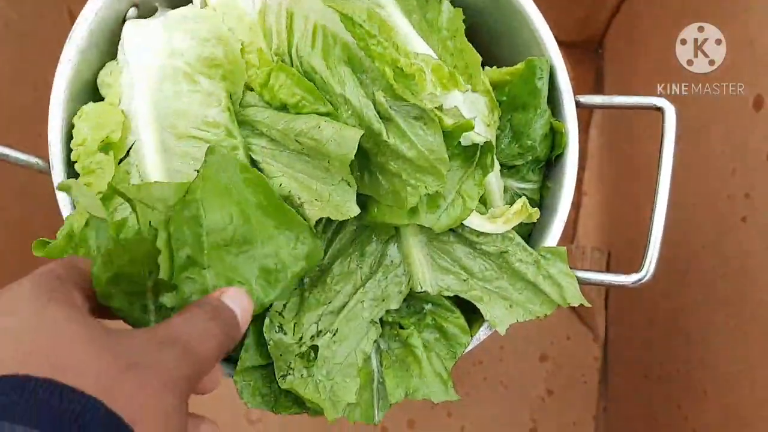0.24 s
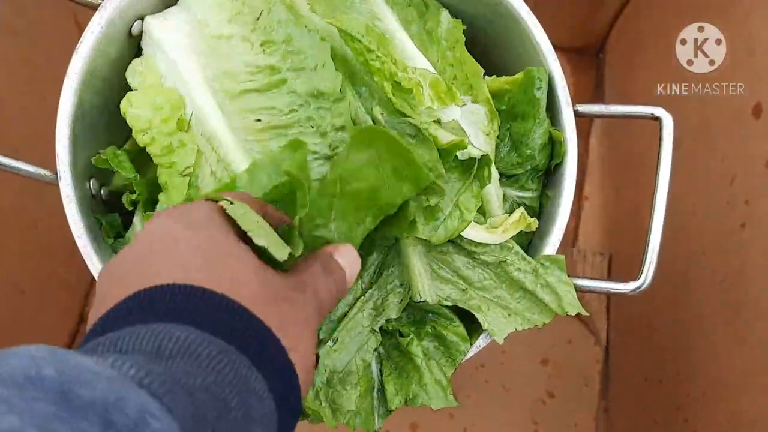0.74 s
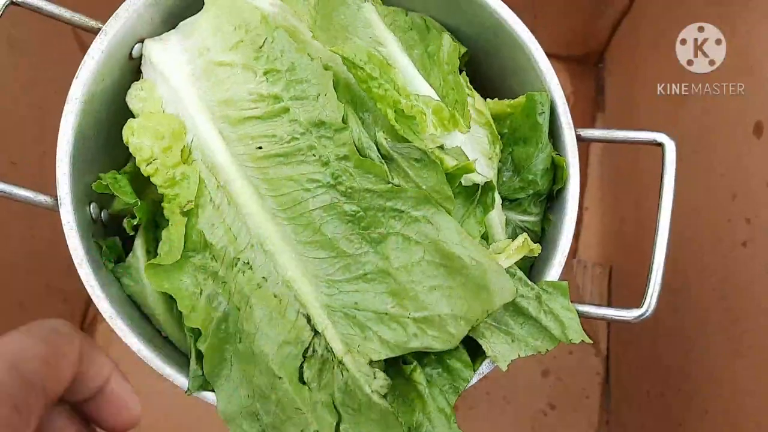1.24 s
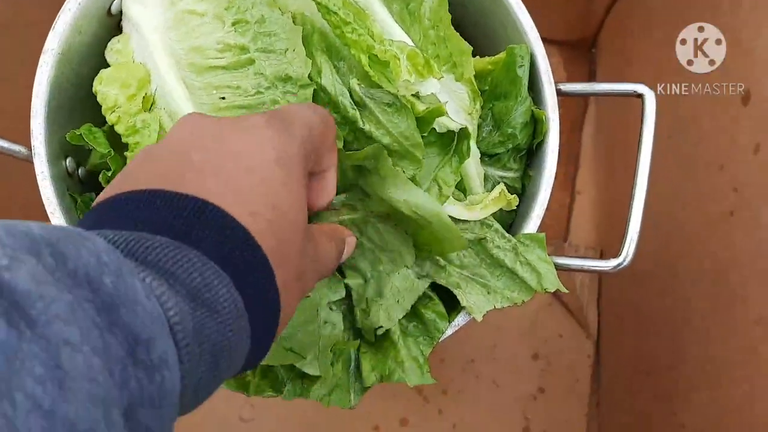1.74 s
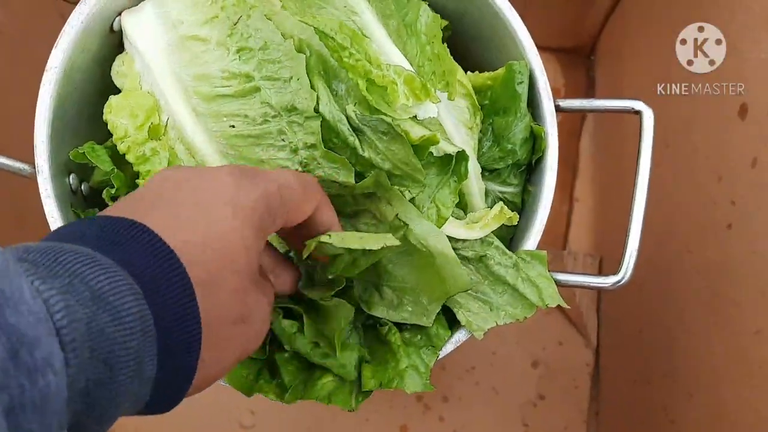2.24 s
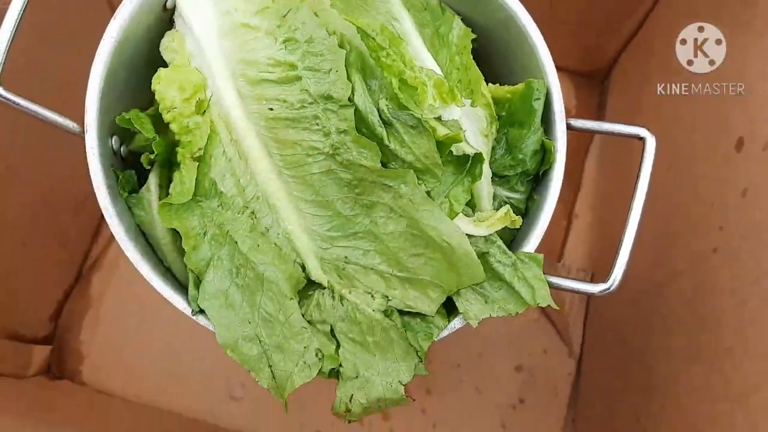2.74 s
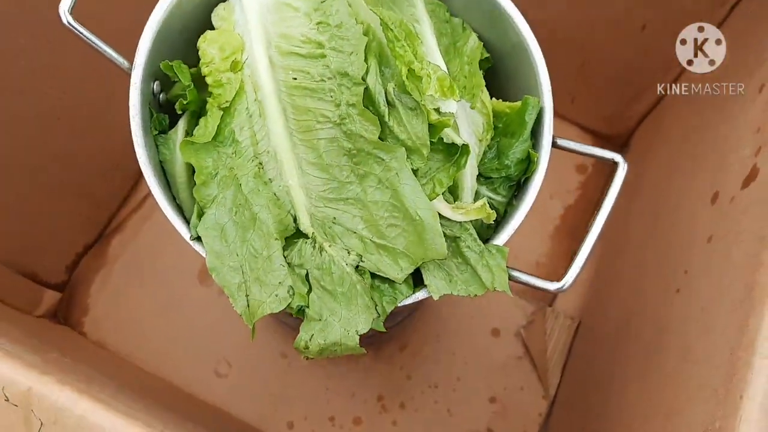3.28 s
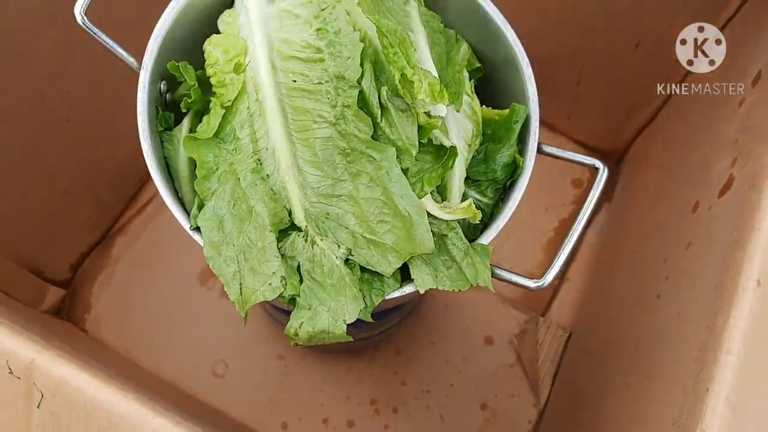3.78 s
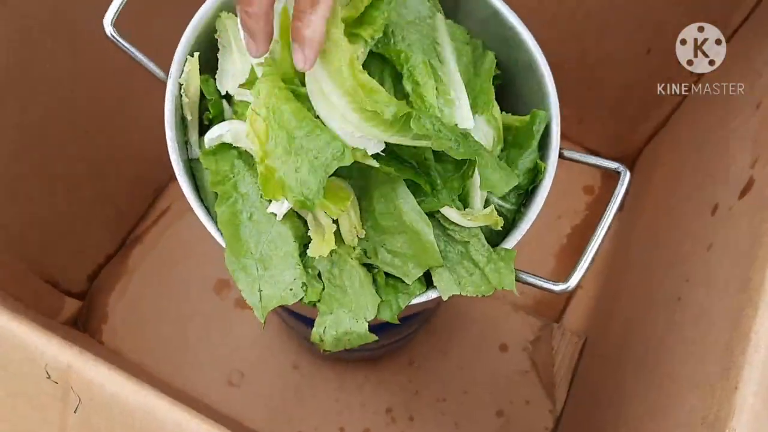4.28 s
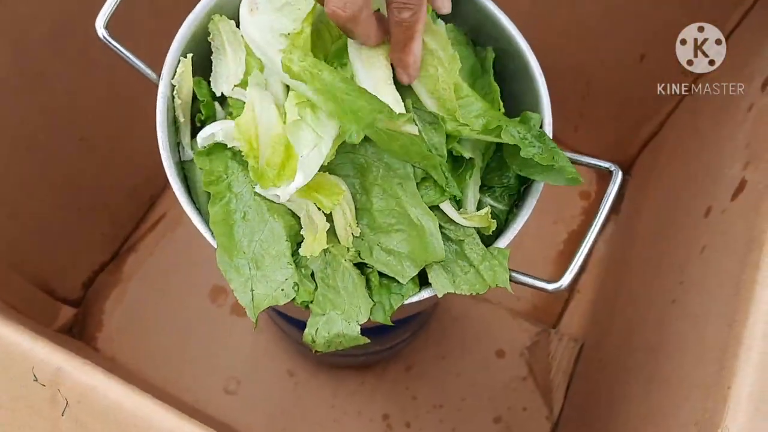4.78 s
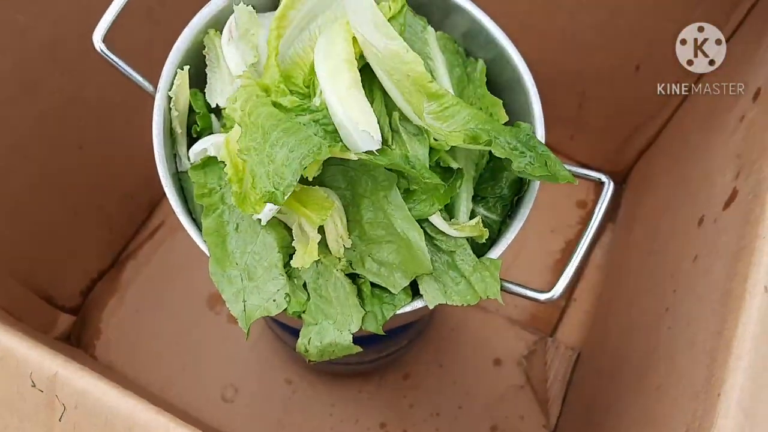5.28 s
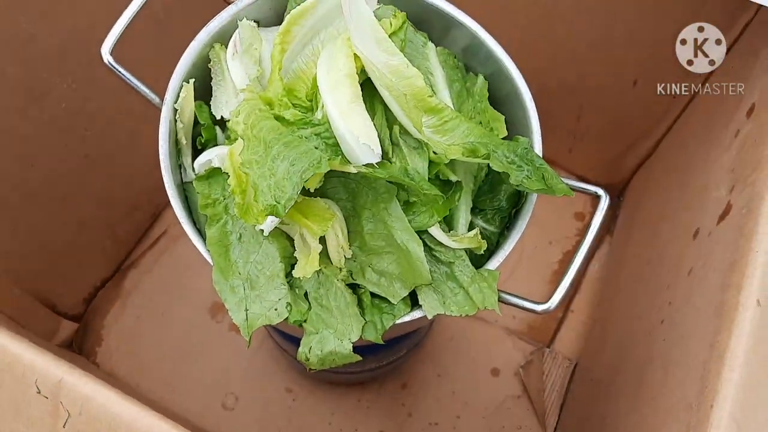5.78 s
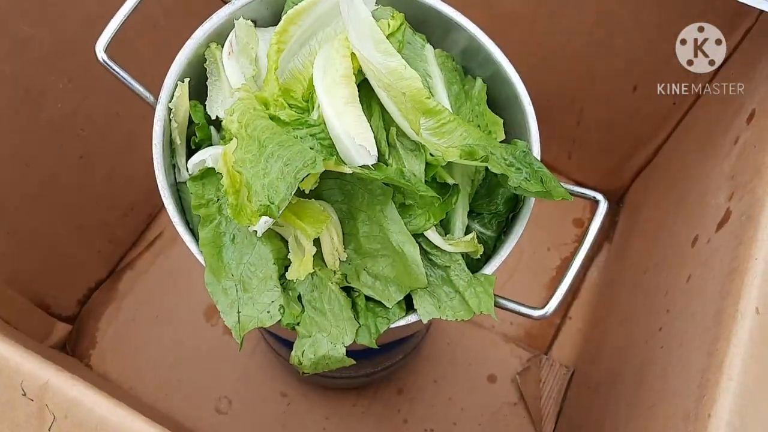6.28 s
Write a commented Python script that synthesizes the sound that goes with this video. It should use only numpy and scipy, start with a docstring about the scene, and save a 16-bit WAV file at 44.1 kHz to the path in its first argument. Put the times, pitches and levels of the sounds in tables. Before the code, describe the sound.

A portable gas burner runs under a cooking pot for the whole six and a half seconds. Its flame makes a deep, uneven rumble with frequent soft, low pops and a slightly hollow roar from the cardboard windbreak. Now and then the rumble drops briefly, often on one side only. Above it, gas hisses steadily with two faint, high, fuzzy whistles. Lettuce leaves snap with small crisp ticks at about 1.7, 2.1 and 2.4 seconds, then rustle softly near 2.8. Between 3.2 and 3.9 seconds the close microphone backs off, and the hiss and roar soften a little. At about 4 seconds a hand rustles the leaves and bumps the pot, giving one short, dull ring. Faint leaf ticks follow around 4.6 and 4.9, and a tiny rustle at 6.3. The flame swells briefly near 4.6 and 6 seconds and keeps burning.

```python
"""The flame of a portable gas burner rumbles and pops under a cooking pot. It burns in uneven puffs,
and the gap under the pot and a cardboard windbreak colour its roar. Now and then the rumble drops
briefly, often on one side only. Gas rushing from the nozzle hisses, with two fuzzy whistles.
A hand rustles lettuce leaves, which tick as they snap, and bumps the pot once.
The microphone starts close and backs off midway."""
import sys
import numpy as np
from scipy import signal
from scipy.fft import rfft, irfft, next_fast_len
from scipy.io import wavfile
from scipy.ndimage import uniform_filter1d, map_coordinates

SR = 44100
rng = np.random.default_rng(int(sys.argv[2]) if len(sys.argv) > 2 else 0)


def waveform_to_disk(signal):
    """Save audio, clipped to [-1, 1], as 16-bit WAV at the path in sys.argv[1]."""
    frames = np.transpose(np.atleast_2d(signal))
    scaled = np.clip(frames, -1, 1) * 32767
    samples = np.round(scaled).astype(np.int16)
    wavfile.write(sys.argv[1], SR, samples)


N = 287515
TIME = np.arange(N) / SR
BACK_OFF_S = (3.2, 3.92)  # the microphone moves away between these times


def amp(db):
    """Turn decibels into a number to multiply by."""
    return np.exp(np.asarray(db) * (np.log(10) / 20))


def unit(x):
    """Scale a signal to an average (rms) strength of 1."""
    return x / np.sqrt(np.mean(np.abs(x) ** 2) + 1e-20)


def along(points, hz):
    """Read between (frequency, value) points, with octaves evenly spaced."""
    f, v = np.transpose(points)
    return np.interp(np.log(hz + 1), np.log(f + 1), v)


def curves(rows):
    """Join timed rows with straight lines: one curve for each column after the time."""
    times, *columns = np.transpose(rows)
    return [np.interp(TIME, times, column) for column in columns]


def wobble(rate):
    """A smooth random curve that takes a new value `rate` times a second."""
    coarse = TIME[::32]
    values = rng.standard_normal(int(N / SR * 100) + 4)
    return np.interp(TIME, coarse, map_coordinates(values, [coarse * min(rate, 100)]))


def sides(pan_db):
    """Left and right gains; a positive pan is louder on the left."""
    return amp(np.array([pan_db / 2, -pan_db / 2]))


def away(near, far):
    """A value that glides from near to far as the microphone backs off."""
    return np.interp(TIME, BACK_OFF_S, (near, far))


def near_far(pair):
    """Fade from the near version of a sound to mostly its far version."""
    share = away(0, 0.95)
    return (1 - share) * unit(pair[0]) + share * unit(pair[1])


def filtered(x, response):
    """Turn each frequency of x up or down by the gain response(f)."""
    size = next_fast_len(x.shape[-1] + 8192)
    return irfft(rfft(x, size) * response(np.fft.rfftfreq(size, 1 / SR)), size)[..., :x.shape[-1]]


def off_centre(f, hz, width_hz):
    """How far f lies from the middle of a band: 0 at hz, about 1 or -1 at its edges."""
    return (f * f - hz * hz) / ((f + 1) * width_hz)


def resonances(table):
    """A filter shape with one hump for each (frequency, width, level) row."""
    return lambda f: np.sqrt(sum((amp(db) / (1 + off_centre(f, hz, width) ** 2)) ** 2
                                 for hz, width, db in table))


def patches(shape, wide_hz, long_s):
    """A random map over frequency and time, with patches about wide_hz by long_s."""
    rows = np.arange(shape[0]) * SR / 1024 / wide_hz
    columns = np.arange(shape[1]) * 512 / SR / long_s
    grid = np.meshgrid(rows, columns, indexing="ij")
    return unit(map_coordinates(rng.standard_normal((200, 300)), grid, mode="wrap", order=2))


# How alike left and right sound: f/Hz, likeness (1 = the same)
LIKENESS = [(60, .62), (130, .52), (290, .68), (700, .88), (1200, .68), (1700, .3), (4000, .62), (6500, .7),
            (10000, .55), (15000, .2)]
# How much louder the left side is: f/Hz, pan/dB
BALANCE = [(60, 1), (110, -3.5), (200, 0), (380, 0.5), (700, 1), (1290, 0.5), (2380, 0.5), (4400, -1.5),
           (8120, -2), (15000, 0)]


def rush(response, patchy_db, wide_hz, long_s, focus=1, drift=0.98, lead=(0, 0)):
    """Rushing stereo noise; wall echoes reach each side with drifting strength and timing."""
    hz, times, noise = signal.stft(rng.standard_normal((2, N + 1024)), SR, nperseg=1024)
    spread = np.arccos(np.clip(focus * along(LIKENESS, hz), 0, 1))[:, None] / 2  # more focus: narrower
    mid, side = np.cos(spread) * noise[0], np.sin(spread) * noise[1]
    # Short waves arrive out of step; lead is the left side's head start in radians, near and far.
    treble = np.clip((hz[:, None] - 1300) / 600, 0, 1)
    phase = drift * patches(mid.shape, 110, 1.46) + np.interp(times, BACK_OFF_S, lead) / 2
    slip = np.exp(1j * treble * phase)
    lean = amp(along(BALANCE, hz) / 2)[:, None]
    both_db, left_db, right_db = (patchy_db * share * patches(mid.shape, wide_hz, long_s)
                                  for share in (0.36, 0.22, 0.31))
    left = (mid + side) * slip * lean * amp(both_db + left_db)
    right = (mid - side) / slip / lean * amp(both_db + right_db)
    pair = signal.istft(np.array([left, right]), SR, nperseg=1024)[1][:, :N]
    return unit(filtered(pair, response))


# The quick touches that make up one bump: t/s, peak level/dB
POT_TOUCHES = [(3.96, -23), (3.972, -26), (3.978, -26), (3.985, -29), (4.005, -33.5), (4.024, -34.5)]
# The tones of the pot: f/Hz, relative level/dB, time to fade by 60 dB/s
POT_TONES = [(332, 0.5, 0.05), (382, 10, 0.059), (426, -1, 0.098), (487, 4, 0.04), (610, -7, 0.036),
             (1040, -2, 0.053), (1292, -8, 0.047), (1504, -7.5, 0.032)]


def pot_bump():
    """A hand bumps the leaf-filled pot, which gives a short, dull ring."""
    out, t = np.zeros(N + SR), TIME[:SR // 4]
    for start, db in POT_TOUCHES:
        ring = sum(amp(level + 3 * rng.standard_normal() - 60 * t / fade_s) * np.sin(2 * np.pi * hz * t)
                   for hz, level, fade_s in POT_TONES)
        ring *= 1 - np.exp(-t / 0.0026)  # soft contact
        out[round(start * SR):][:len(t)] += amp(db) * ring / np.max(np.abs(ring))
    return out[:N] * sides(3.5)[:, None]


# Leaves snapping: t/s, level/dB, f/Hz, width/Hz
LEAF_TICKS = [(1.7192, -31, 3600, 5000), (1.719, -34, 1100, 1500), (1.719, -41, 12500, 8000),
              (2.106, -38, 12600, 10000), (2.1062, -52, 2500, 3000), (2.1085, -34, 10000, 14000),
              (2.1446, -47, 11000, 8000), (2.441, -40, 7060, 9000), (3.5045, -45, 9000, 9000),
              (3.8955, -42, 6500, 9000), (3.973, -38, 3630, 2500), (4.5995, -45, 3020, 3000),
              (4.899, -48, 5000, 5000)]
# Leaves being handled: t/s, length/s, level/dB, f/Hz, width/Hz
LEAF_RUSTLES = [(2.748, 0.16, -47.5, 2200, 1800), (2.771, 0.1, -46.5, 700, 250),
                (2.797, 0.094, -52.5, 1290, 200), (3.889, 0.033, -39.5, 7900, 7000),
                (3.918, 0.061, -43, 3200, 930), (3.92, 0.11, -42.5, 4500, 10000),
                (3.961, 0.046, -42.5, 960, 1120), (3.96, 0.17, -48.5, 3180, 4000),
                (4.6, 0.03, -54, 3300, 3500), (6.292, 0.1, -55, 2000, 2500)]


def leaves():
    """Crisp leaves tick as they snap and crackle densely under the hand."""
    out, t = np.zeros((2, N + SR)), TIME[:SR // 5]
    tick_fade = amp(-60 * t / 0.0069)
    for start, db, hz, width_hz in LEAF_TICKS:
        crack = unit(filtered(rng.standard_normal(len(t)), resonances([(hz, width_hz, 0)])))
        ring = 0.5 * np.sin(2 * np.pi * hz * t)
        snap = tick_fade * (ring + crack)
        out[:, round(start * SR):][:, :len(t)] += amp(db) * sides(pan_db=-9)[:, None] * snap
    for start, length, db, hz, width_hz in LEAF_RUSTLES:
        left, other = rng.standard_normal((2, len(t)))
        right = np.roll(left, 2) + 1.1 * other  # two samples late, plus noise of its own
        clumps = amp(2.0 * unit(uniform_filter1d(rng.standard_normal(len(t)), size=64)))
        crackle = np.array([left, right]) * clumps
        band = unit(filtered(crackle, lambda f: 1 / np.sqrt(1 + off_centre(f, hz, width_hz) ** 4)))
        swell = np.abs(np.sin(np.pi * np.clip(t / length, 0, 1))) ** 1.64
        out[:, round(start * SR):][:, :len(t)] += amp(db) * swell * band
    return out[:, :N]


# Moments when the rumble briefly drops, often on one side only: middle t/s, length/s, drop/dB, pan/dB
RUMBLE_DIPS = [(0.66, 0.055, 21, -23), (1.148, 0.072, 6.5, -7), (1.977, 0.061, 9, -23),
               (2.532, 0.18, 14.5, -25.5), (3.468, 0.052, 19, 27), (3.745, 0.11, 5, 12),
               (4.483, 0.18, 9, 8), (4.79, 0.092, 12.5, 27), (5.134, 0.032, 7, 5), (5.332, 0.026, 11, 4),
               (5.705, 0.03, 19, -6), (6.134, 0.16, 18, 15), (6.425, 0.079, -2.5, -6)]


def dips():
    """The rumble's brief drops as two curves in dB: overall level and left-right balance."""
    coarse = TIME[::32]
    dip_and_pan = sum(np.outer([-db, pan_db], np.exp(-(2 * (coarse - middle) / length) ** 2))
                      for middle, length, db, pan_db in RUMBLE_DIPS)
    return [np.interp(TIME, coarse, curve) for curve in dip_and_pan]


# Tone of the hiss, a near list and a far list: f/Hz, relative level/dB
HISS_SHAPES = ([(900, -89), (1500, -2), (1910, -3), (2250, 0), (3050, -1.5), (3320, 1.5), (3570, -1.5),
               (4250, 0), (4650, -0.5), (4950, -7), (5250, -1), (6300, 0), (7400, -3.5), (9200, -5.5),
               (10500, -8.5), (12500, -2), (14000, -7), (15600, -6.5)], [(900, -87), (1500, -6.5),
               (1890, -2.5), (2100, -5.5), (2500, -1), (3000, 0), (3200, 0), (3580, 1.5), (3950, -2),
               (4200, 2.5), (4380, -3.5), (4550, 4.5), (4850, -5.5), (5700, -5.5), (6300, -6), (7500, -2),
               (9200, -5.5), (10500, -6), (12500, -3.5), (14000, -6.5), (15600, -5.5)])


def gas_hiss(flow):
    """Gas leaving the nozzle makes a broad hiss that flickers with the flow."""
    hiss = near_far(rush(lambda f: np.array([amp(along(shape, f))[None] for shape in HISS_SHAPES]),
                         patchy_db=5.5, wide_hz=119.8, long_s=0.06, focus=0.65))
    hiss /= np.std(filtered(hiss, lambda f: (f > 1800) & (f < 5000)))  # this band sets the level
    return amp(away(-53.5, -55) + 0.45 * flow) * hiss


# Loudness of the whistles: t/s, low whistle level/dB, high whistle level/dB
WHISTLE_LEVELS = [(0.0, -52.5, -55), (0.89, -58.5, -53), (1.16, -52, -55), (1.61, -57, -52),
                  (1.78, -48.5, -52), (2.8, -55.5, -55), (2.81, -54, -51), (3.43, -60, -55.5),
                  (3.76, -55.5, -53), (3.96, -52.5, -54), (4.12, -59, -59), (4.66, -51.5, -56.5),
                  (5.03, -56, -52), (5.16, -56.5, -55.5), (6.01, -55, -55.5), (6.12, -59, -56.5),
                  (6.34, -50.5, -52), (6.52, -58, -55)]
# The low whistle, a deeper list and a sharper list: f/Hz, width/Hz, relative level/dB
LOW_WHISTLE_BANDS = [(6200, 190, 5), (6500, 93, 6), (6150, 280, -1), (6700, 220, -6)], [(6670, 90, 4.5),
                     (6500, 230, 0.5), (6020, 360, -4.5)]
# The high whistle: f/Hz, width/Hz, relative level/dB
HIGH_WHISTLE_BANDS = [(9980, 750, -0.5), (10510, 380, 1.5), (11000, 180, -1), (11400, 650, -4.5),
                      (12400, 440, -14)]


def gas_whistles(flow):
    """The gas jet whistles in two fuzzy bands; the lower one sinks a little midway."""
    low_db, high_db = curves(WHISTLE_LEVELS)
    stereo = dict(focus=1.3, drift=0.3)
    deep, sharp = rush(lambda f: np.array([resonances(bands)(f)[None] for bands in LOW_WHISTLE_BANDS]),
                       patchy_db=1.0, wide_hz=112.9, long_s=0.06, lead=(1.17, -1.63), **stereo)
    sharp_share = np.interp(TIME, (2.8, 3.1), (1, 0.034))
    low = (1 - sharp_share) * unit(deep) + sharp_share * unit(sharp)
    high = rush(resonances(HIGH_WHISTLE_BANDS),
                patchy_db=6, wide_hz=220, long_s=0.25, lead=(-1.65, -1.3), **stereo)
    return (amp(low_db + 0.9 * flow + 0.69 * wobble(31)) * low
            + amp(high_db + 0.11 * flow + 1.47 * wobble(22.12)) * high)


# Sudden pops in the flame: t/s, peak level/dB, f/Hz
FLAME_POPS = [(0.026, -31, 88), (0.161, -33.5, 96), (0.269, -33.5, 126), (0.3, -33, 88), (0.483, -28.5, 93),
              (0.578, -32.5, 84), (0.738, -30.5, 87.5), (.773, -30.5, 90), (0.809, -30, 90),
              (0.95, -29.5, 87), (1.029, -35.5, 85), (1.376, -29, 88), (1.901, -40, 94), (2.101, -28.5, 88),
              (2.14, -28.5, 89), (2.566, -31, 129), (2.926, -33, 91), (2.988, -34, 88), (3.068, -36.5, 84),
              (3.142, -32.5, 80), (4.136, -30, 88), (4.254, -40, 92), (4.592, -39, 107), (4.616, -26.5, 75),
              (4.655, -31, 84), (4.73, -29, 102), (4.835, -33.5, 88), (4.876, -34, 83), (4.954, -35, 113),
              (5.196, -32.5, 87), (5.222, -29, 83), (5.269, -33, 90), (5.371, -31.5, 92), (5.422, -37, 90),
              (5.485, -30, 84), (5.795, -33.5, 132), (5.909, -28, 90), (5.985, -27.5, 87), (6.192, -29, 88),
              (6.234, -30, 86), (6.34, -23, 85), (6.462, -25, 72)]


def flame_pops():
    """A pocket of gas lights all at once and gives the air one short, low push."""
    out, t = np.zeros((2, N + SR)), TIME[:SR // 10]
    for (start, db, hz), pan_db in zip(FLAME_POPS, rng.standard_normal(len(FLAME_POPS))):
        push = np.sin(2 * np.pi * hz * t) * t * hz * np.exp(-1.6 * t * hz)
        push /= np.max(np.abs(push))
        out[:, round(start * SR):][:, :len(t)] += amp(db) * np.outer(sides(pan_db), push)
    return out[:, :N]


# Loudness of the roar under the pot: t/s, level/dB
ROAR_LEVELS = [(0, -47), (.55, -48.5), (1.14, -46), (1.54, -50.5), (2.0, -49), (2.5, -52), (2.9, -48.5),
               (3.2, -50.5), (3.55, -46.5), (3.85, -49), (4.4, -47.5), (4.94, -46), (5.19, -49.5),
               (5.3, -48), (5.9, -48), (6.2, -52), (6.35, -46), (6.52, -54.5)]
# Air ringing between burner and pot: f/Hz, width/Hz, relative level/dB
GAP_BANDS = [(302.3, 110, 5.5), (408, 130, -8.5), (227, 20, -7)]
# Echoes inside the windbreak, a near list and a far list: f/Hz, width/Hz, relative level/dB
WINDBREAK_BANDS = ([(620, 250, -1.5), (664, 140, 0.5), (770, 170, -3), (921, 126, 1), (1270, 236, -5)],
                   [(540, 300, 0.5), (700, 96, 1.5), (793, 89, -0.5), (930, 160, 2), (1074, 180, -5),
                   (1268, 250, -7)])


def flame_roar(puff, dip_db):
    """The flame roars low in the gap under the pot and higher inside the windbreak."""
    gap_db, = curves(ROAR_LEVELS)
    gap = rush(resonances(GAP_BANDS), patchy_db=1.5, wide_hz=100, long_s=0.13)
    gap = unit(amp(1.56 * puff + 0.7 * wobble(12)) * gap)
    echoes = rush(lambda f: np.array([resonances(bands)(f)[None] for bands in WINDBREAK_BANDS]),
                  patchy_db=3.0, wide_hz=184.6, long_s=0.08)
    echoes = unit(amp(0.69 * puff + 0.62 * wobble(8)) * near_far(echoes))
    return amp(gap_db + 0.1 * dip_db) * gap + amp(away(-51, -55) + 0.11 * dip_db) * echoes


# Loudness of the rumble, before the dips: t/s, level/dB
RUMBLE_LEVELS = [(0, -43.5), (.5, -40.5), (.9, -42.5), (1.3, -42), (1.9, -40.5), (2.15, -41.5),
                 (2.45, -39.5), (3.05, -40), (3.5, -41), (3.85, -41.5), (4.35, -42.5), (4.63, -35),
                 (4.85, -42.5), (5.4, -41.5), (5.75, -40.5), (6.0, -35.5), (6.35, -39.5), (6.52, -44)]
# Tone of the rumble: f/Hz, relative level/dB
RUMBLE_SHAPE = [(12, -58), (22, -19), (45, -12), (62, -4), (72, -1.5), (83, -1), (100, -9.5), (125, -7.5),
                (165, -10.5), (230, -20.5), (300, -37), (500, -120)]


def flame_rumble(puff, dip_db, dip_pan_db):
    """Swirling gas burns unevenly and makes a deep, lumpy rumble."""
    level_db, = curves(RUMBLE_LEVELS)
    noise = rush(lambda f: amp(along(RUMBLE_SHAPE, f)), patchy_db=0.1, wide_hz=86.4, long_s=0.58)
    power = uniform_filter1d(np.mean(noise ** 2, axis=0), round(0.08 * SR))
    noise /= np.sqrt(np.abs(power) + 0.031)  # even it out, so the puffs shape it
    puff_db = 0.37 * puff - 4 * np.clip(puff, -1.4, 0) ** 2  # an extra drop between puffs
    swell_db = -0.5 * wobble(11)
    draught_db = 1.4 * np.array([wobble(27), wobble(49)])  # air stirs past each side on its own
    rumble = unit(amp(puff_db + swell_db + draught_db) * noise)
    return amp(level_db + dip_db) * sides(away(-0.5, 5) + dip_pan_db) * rumble


def scene():
    """Pot, leaves, gas jet and flame together."""
    dip_db, dip_pan_db = dips()
    flow = wobble(8.7)  # moves hiss and whistles together
    puff = wobble(21)  # each puff of gas lifts rumble and roar together
    jet = amp(0.13 * dip_db) * (gas_hiss(flow) + gas_whistles(flow))
    flame = flame_pops() + flame_roar(puff, dip_db) + flame_rumble(puff, dip_db, dip_pan_db)
    return pot_bump() + leaves() + jet + flame


def record(dry):
    """The microphone softens the deepest bass and cuts off the highest treble."""
    bottom_hz, top_hz = 26.8, 15520
    return filtered(dry, lambda hz: (hz < top_hz) * hz ** 2 / np.sqrt(hz ** 4 + bottom_hz ** 4))


dry = scene()
out = record(dry)
waveform_to_disk(out)
```